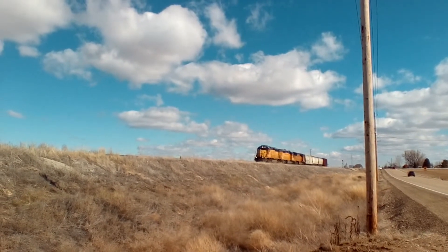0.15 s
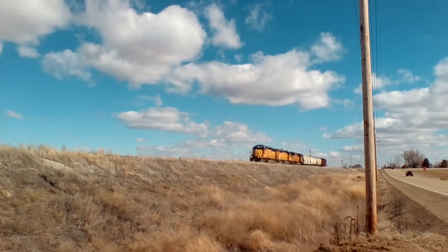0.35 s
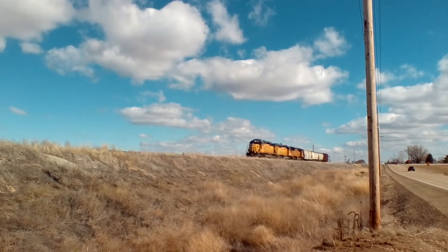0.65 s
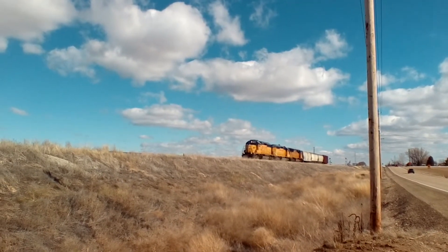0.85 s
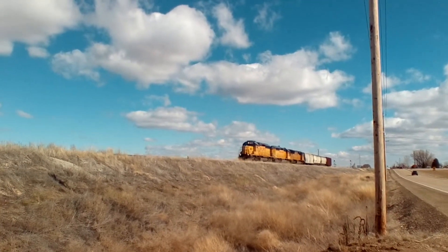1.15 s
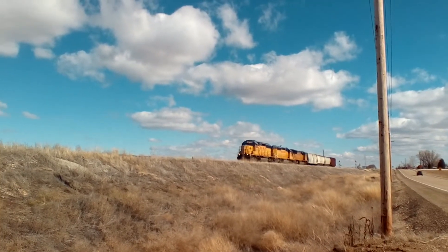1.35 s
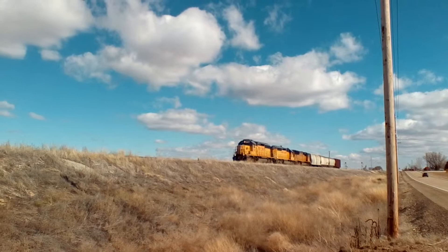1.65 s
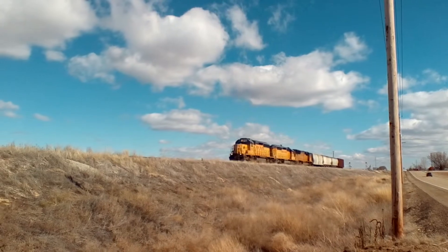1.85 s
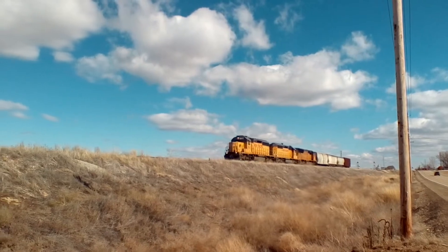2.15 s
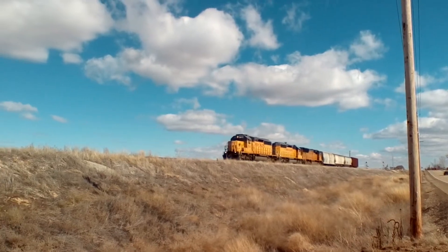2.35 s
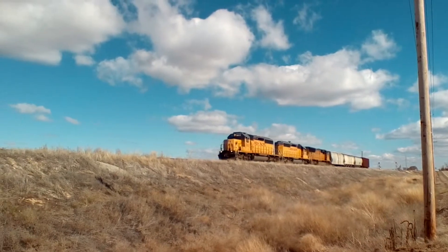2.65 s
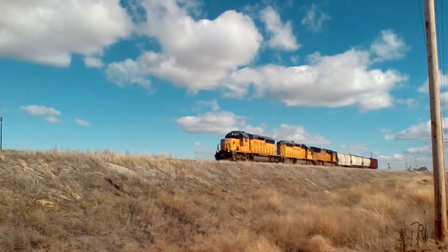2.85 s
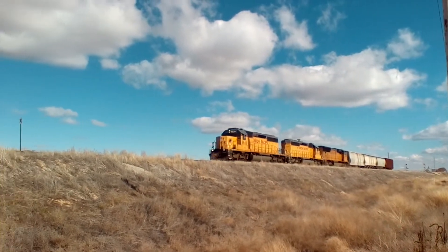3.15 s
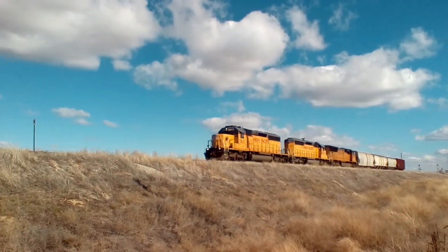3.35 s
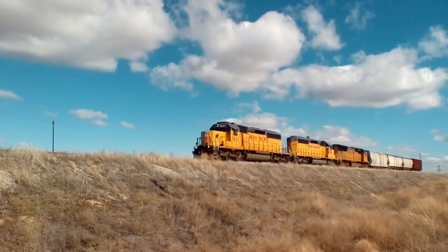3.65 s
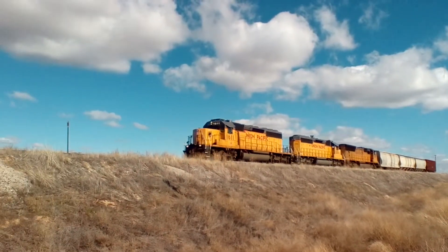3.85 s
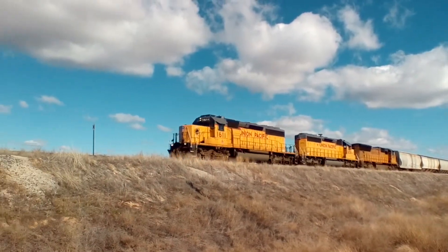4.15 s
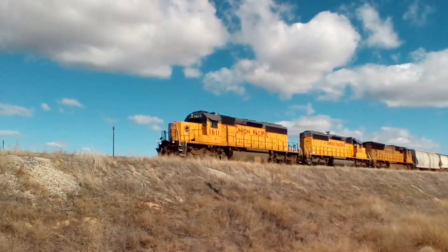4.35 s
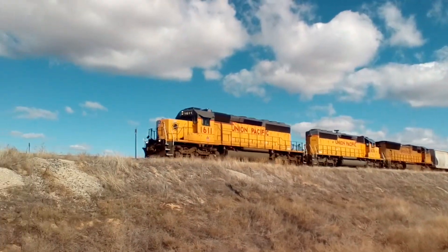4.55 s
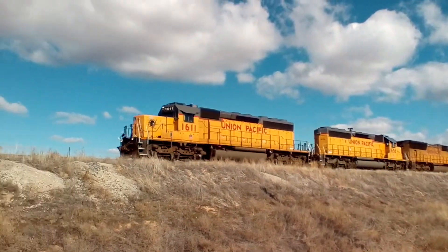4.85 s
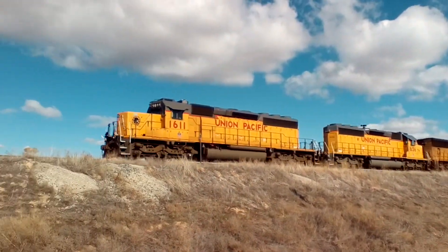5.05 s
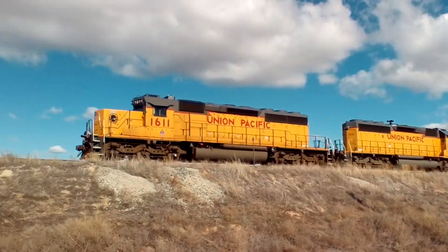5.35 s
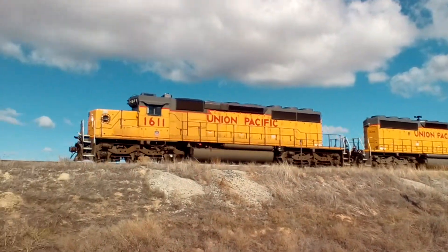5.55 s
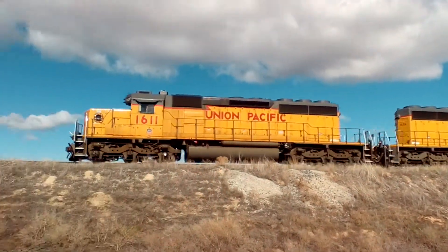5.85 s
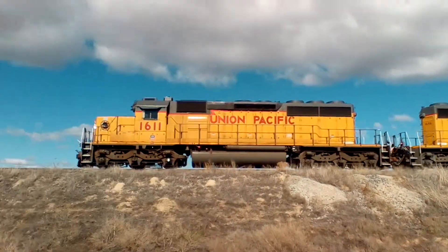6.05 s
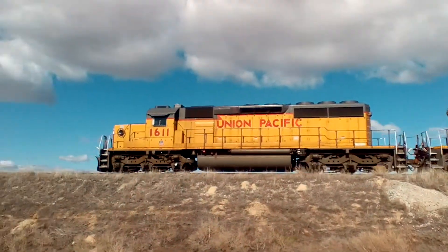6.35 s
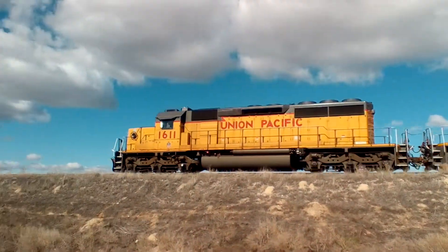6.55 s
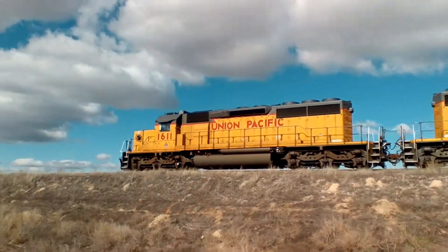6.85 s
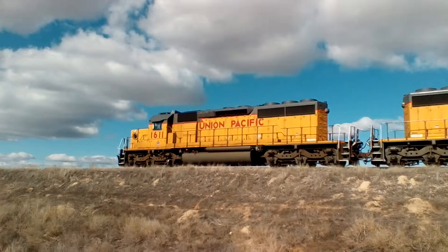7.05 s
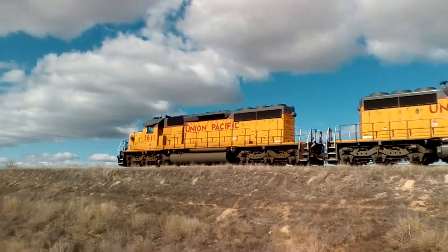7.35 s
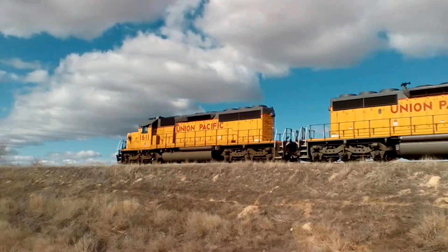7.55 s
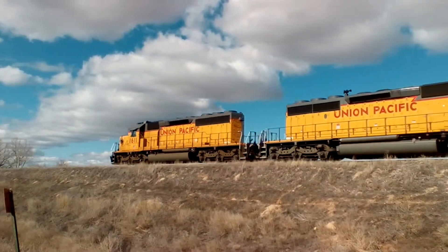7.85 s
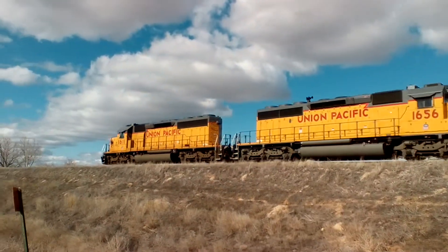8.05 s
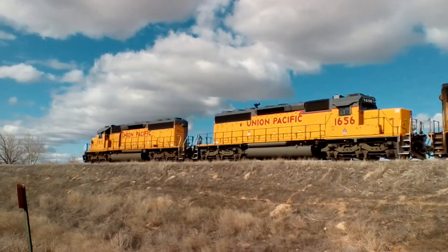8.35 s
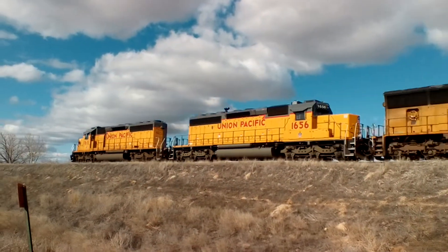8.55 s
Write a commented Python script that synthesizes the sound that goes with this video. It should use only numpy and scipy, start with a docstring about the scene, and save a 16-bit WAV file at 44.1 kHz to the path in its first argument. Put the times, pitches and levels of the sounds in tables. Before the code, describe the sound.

A low, uneven diesel throb begins far off in open country, nearly alone over faint microphone hiss and tiny ticks. Running gear emerges as a muffled roar, opening up as the train nears. One abrupt blow-off of compressed air cuts through just before the engine comes abreast. The pitch sinks slightly in passing, while wheels and panels hum, briefly squeal and clatter in beats, still building when it stops. Small single-channel camera microphone.

```python
"""At the foot of an embankment, diesel locomotives at low throttle roll towards a small camera and pass beside it.
Sine tones locked to the crankshaft, over noise, make the throbbing exhausts and the blower whine.
Shaped noise makes the running gear, which roars and brightens as it nears, and one blow-off of an air valve.
Panels and wheels sing as swelling tones; faint ticks and clicks are short puffs and impulses.
The camera's case and microphone port colour the treble; it limits peaks and hisses faintly."""
import sys
import numpy as np
from scipy import signal
from scipy.fft import rfft, irfft, next_fast_len
from scipy.io import wavfile
from scipy.ndimage import uniform_filter1d, minimum_filter1d, map_coordinates

SR = 44100
rng = np.random.default_rng(int(sys.argv[2]) if len(sys.argv) > 2 else 0)


def dump_mix(stems):
    """Bounce the given channels to the path in sys.argv[1] as a 16-bit WAV at rate SR."""
    frames = np.atleast_2d(stems).T  # one column per channel
    limited = np.clip(frames, -1, 1)  # hard clip at full scale
    pcm = np.round(limited * 32767).astype(np.int16)
    wavfile.write(sys.argv[1], SR, pcm)


N = 384552  # length in samples

# Engine loudness over time: t/s, upper tones level/dB, deep tone level/dB, rumble level/dB
ENGINE_LEVELS = [(0, -36.5, -46, -42), (2, -39.5, -48, -36), (4, -34.5, -40, -32.5),
                 (5.5, -33.5, -33.5, -32), (7, -35.5, -34.5, -27), (8.72, -35.5, -40.5, -27.5)]
# Uneven cylinders sound many multiples of the shaft rate: multiple, relative level/dB
EXHAUST_ORDERS = [(9, -19), (10, -9.5), (12, -16), (13, -15), (15, 5), (16, -2.5), (17, -1.5), (18, -5)]
# Colour of the exhaust rumble: f/Hz, relative level/dB per Hz
RUMBLE_COLOUR = [(20, -45), (33, -21), (40, -9.5), (59, -4), (86, -2), (99, -2.5), (119, -7.5), (150, -12),
                 (200, -39.5), (330, -120)]
# Blower gears: multiple of the shaft rate, start t/s, end t/s, level at start/dB, growth/dB per s
BLOWER_WHINES = [(100, 2.1, 4.1, -50, 4.5), (158, 3.3, 4.0, -57, 0), (200, 3.3, 5.9, -55, 2.5)]
# Running gear and engine rooms: t/s, roar level/dB, clatter level/dB
ROLLING_LEVELS = [(0.0, -49, -58), (0.68, -46.5, -63.5), (2.2, -43, -59), (3.06, -37.5, -53.5),
                  (3.74, -34, -49), (4.73, -30.5, -44), (5.4, -27, -40.5), (5.9, -24.5, -34.5),
                  (6.85, -23, -35), (7.3, -22, -33), (7.84, -21.5, -31), (8.72, -18, -26.5)]
# Train colour when hidden behind the bank: f/Hz, relative level/dB per Hz
HIDDEN_COLOUR = [(76, -34.5), (130, 0.5), (222, -11.5), (288, -8.5), (356, -16), (428, -11.5), (462, -15),
                 (498, -10.5), (666, -14.5), (800, -23.5), (850, -19), (1090, -24), (1690, -33),
                 (2800, -41), (3800, -58), (4300, -76), (5000, -87.5), (6500, -92), (11000, -120)]
# Train colour when alongside: f/Hz, relative level/dB per Hz
ALONGSIDE_COLOUR = [(76, -39), (130, -13.5), (183, 0), (262, 0.5), (370, -3.5), (474, -7.5), (618, -10),
                    (1150, -22), (1460, -22.5), (1870, -19.5), (2150, -22.5), (2760, -19), (3490, -30),
                    (4990, -50), (5400, -65), (7020, -93), (11900, -120)]
# Clatter beats, regular short swells of the clatter: first beat t/s, limit for last beat t/s, beats per s,
# level rise/dB
CLATTER_BEATS = [(5.1, 5.66, 5.45, 2.5), (6.754, 8.56, 6.66, 3)]
# The near train's highest hiss: f/Hz, relative level/dB per Hz
RUSTLE_COLOUR = [(3240, -43), (5500, -12), (6050, -8), (6570, -20.5), (7010, -22.5), (9750, -19.5),
                 (13600, 1.5), (14300, 2), (15500, -13.5)]
# Body panels and wheels that sing for a while: middle t/s, length/s, f/Hz, level/dB
SINGING_PARTS = [(.6, 1.4, 439, -58), (4.5, .5, 432, -44.5), (5.85, 0.16, 699, -39), (6.0, .4, 547, -36),
                 (6.9, .61, 185, -30.5), (7.1, .67, 255, -27.5), (7.5, .54, 175, -27.5),
                 (7.75, 0.7, 212, -22), (7.9, 1.3, 377.5, -26.5), (7.98, .15, 1895, -33.5),
                 (8.1, 0.8, 255, -29.5), (8.18, 1.1, 197, -33), (8.2, .36, 1970, -40.5),
                 (8.55, .17, 1696, -31.5), (8.58, .3, 345, -25)]
# Panels struck once a shaft turn: middle t/s, length/s, f/Hz, level/dB, moment of one throb peak t/s
THROBBING_PANELS = [(5.05, .75, 383, -33, 4.98), (6.3, 1.8, 284.5, -21.5, 6.2)]
# Valve jet, first its body and then its top: seep level/dB, cracked level/dB, open level/dB,
# peak level/dB, pressure loss/dB per s, closing/dB per s
VALVE_LEVELS = [(-60, -35.5, -24.5, -21, 24, 109.5), (-69, -59, -45, -39.5, 48.5, 100)]
# Colour of the jet's body: f/Hz, relative level/dB per Hz
JET_BODY_COLOUR = [(470, -36.5), (800, -15), (983, -7.5), (1180, -9), (1260, -6.5), (1630, -6),
                   (1850, -2.5), (2190, -1.5), (2860, 2), (3860, -10.5), (5300, -25), (6890, -57),
                   (11700, -120)]
# Colour of the jet's top: f/Hz, relative level/dB per Hz
JET_TOP_COLOUR = [(3120, -48.5), (5300, -18.5), (6180, -18.5), (8010, -30.5), (9950, -20.5), (10300, -19.5),
                  (10900, -22.5), (12300, -15), (13600, -0.5), (15500, -16)]
# Faint dull ticks: t/s, peak level/dB, f/Hz
DULL_TICKS = [(.287, -57, 3030), (1.054, -69, 3740), (1.292, -69, 3600), (1.514, -65, 3950),
              (2.44, -75, 4600)]
# Tiny sharp clicks: t/s, peak level/dB
SHARP_CLICKS = [(7.7687, -55), (7.829, -56), (7.9088, -63), (7.9488, -52), (8.129, -58), (8.27, -65),
                (8.4886, -50.5)]
# The camera case rings along: f/Hz, width/Hz, boost level/dB
CASE_PEAKS = [(1257, 34, 2.5), (1543, 31, 2.5), (1660, 28, 1.5), (1876, 22, 4.5), (2004, 27, 4.5),
              (2367, 38, 2), (2470, 47, 3), (2900, 57, 3), (3270, 44, 3), (3360, 62, 3.5), (3500, 18, 4.5),
              (3810, 31, 5), (4180, 25, 1.5)]
# Dips of the microphone port: f/Hz, width/Hz, change of level/dB
PORT_DIPS = [(5520, 290, -13), (6560, 110, -40.5), (7500, 57, -22.5), (8040, 81, -29), (8740, 200, -14),
             (10900, 200, -7.5)]
# Colour of the microphone hiss: f/Hz, relative level/dB per Hz
HISS_COLOUR = [(2650, -58), (4500, -21.5), (5390, -33), (10300, -23.5), (11100, -16), (12400, -7.5),
               (13600, 2.5), (14400, -5.5), (15200, -12), (15500, -14)]

# Crankshaft turns per s, train speed, nearest distance and its moment
SHAFT_HZ, SPEED_M_S, TRACK_M, ABREAST_S = 5.28, 17.5, 16, 6.3
FADE_DB_PER_S = 25  # how fast a whine comes in and dies away
# Clatter levels of a hidden and a clear train; the clearest view reached (1 = fully clear)
HIDDEN_DB, IN_VIEW_DB, NEAREST = -66, -28, .82
RUSTLE_DB, RUSTLE_GROWS = -69, 1.3  # level at the loudest clatter; dB per dB of clatter
SING_WANDER_PER_S, THROB_WANDER_PER_S = 20, 9  # how often the tones waver
THROB_DEPTH_DB, THROB_SCATTER_DB = 16, 2
# The valve seeps, cracks, opens, peaks, closes; STEP_S is how long each sudden step takes
LEAK_S, CRACK_S, OPEN_S, PEAK_S, SHUT_S, STEP_S = 5.71, 5.92, 5.945, 5.977, 6.38, .011
CLICK_HZ, CLICK_WIDTH_HZ = 11500, 3000
CEILING = .43  # limiter threshold (1 = full scale)
HISS_DB, FLICKER_ABOVE_HZ = -76, 10700  # the hiss is steady below this frequency
TOP_HZ = 15680  # nothing passes from here up


def engines():
    """Each exhaust tone is a multiple of the shaft rate, over pipe rumble; blower gears whine higher up."""
    tone_db, deep_db, rumble_db = curves(ENGINE_LEVELS)
    angle = shaft()

    def exhaust_tone(multiple):
        """One shaft multiple, wavering in strength and phase."""
        strength = amp(1.5 * wobble(1.2))
        phase = rng.uniform(0, 2 * np.pi) + .5 * wobble(1.5)
        return strength * np.sin(multiple * angle + phase)

    tones = sum(amp(db) * exhaust_tone(multiple) for multiple, db in EXHAUST_ORDERS)
    deep = exhaust_tone(8)
    rumble = noise(RUMBLE_COLOUR)
    exhaust = amp(tone_db) * unit(tones) + amp(deep_db) * unit(deep) + amp(rumble_db) * rumble
    return exhaust + blower(angle)


def blower(angle):
    """The blower gears sound high multiples of the shaft rate, so their whine follows the shaft."""
    t = np.arange(N) / SR
    whine = np.zeros(N)
    for multiple, start, end, db, growth_db in BLOWER_WHINES:
        outside_s = np.maximum(np.maximum(start - t, t - end), 0)
        level_db = db + growth_db * (t - start) - FADE_DB_PER_S * outside_s + 1.8 * wobble(6)
        whine += amp(level_db) * np.sin(multiple * angle + .7 * wobble(12))
    return whine


def shaft():
    """Crankshaft angle as heard: the pitch drops as the train goes by, as approach turns to departure."""
    ahead_m = SPEED_M_S * (ABREAST_S - np.arange(N) / SR)
    approach_m_s = SPEED_M_S * ahead_m / np.hypot(ahead_m, TRACK_M)
    return turns(SHAFT_HZ * (1 + approach_m_s / 343))  # 343 m/s is the speed of sound


def rolling():
    """A low roar under a swelling clatter; bank and air hide the treble until the train is near."""
    hz, t, z = signal.stft(rng.standard_normal(N), SR, nperseg=1024)
    at = np.minimum((t * SR).astype(int), N - 1)
    roar_curve, clatter_curve = curves(ROLLING_LEVELS)
    roar_db, clatter_db = roar_curve[at], clatter_curve[at]
    near = np.clip((clatter_db - HIDDEN_DB) / (IN_VIEW_DB - HIDDEN_DB), 0, NEAREST)

    # blend the hidden colour into the near one
    far_db = np.outer(along(HIDDEN_COLOUR, hz), 1 - near)
    near_db = np.outer(along(ALONGSIDE_COLOUR, hz), near)
    colour = amp(far_db + near_db)
    # roar hands over to clatter between 640 and 1280 Hz
    high = np.clip(np.log2(hz / 640 + 1e-3), 0, 1)[:, None]
    roar = amp(roar_db) * unit_frames(colour * np.sqrt(1 - high))
    clatter = amp(clatter_db + clatter_beats(t)) * unit_frames(colour * np.sqrt(high))

    # moving air mottles far sound most: smooth random patches in time and pitch
    patches = rng.standard_normal(z.shape)
    for axis in (0, 1):
        patches = uniform_filter1d(patches, size=4, axis=axis)
    depth_db = .4 + high * (.7 + 2.6 * (1 - near) ** 2)
    mottle = amp(depth_db * unit(patches))
    train = signal.istft(z * np.hypot(roar, clatter) * mottle, SR, nperseg=1024)[1][:N]
    return train + rustle(clatter_curve)


def unit_frames(part):
    """Scale each time frame to rms 1 across pitch."""
    return part / np.sqrt(np.mean(part ** 2, axis=0))


def clatter_beats(t):
    """Regular short swells of the clatter, in dB."""
    rise_db = 0
    for first, last, rate, db in CLATTER_BEATS:
        for s in np.arange(first, last, 1 / rate):
            rise_db = rise_db + db * np.exp(-((t - s) / .035) ** 2)
    return rise_db


def rustle(clatter_db):
    """The train's highest hiss: noise that grows faster than the clatter."""
    level_db = RUSTLE_DB + RUSTLE_GROWS * (clatter_db - clatter_db.max()) + 2.5 * wobble(25)
    return amp(level_db) * noise(RUSTLE_COLOUR)


def singing():
    """Panels and wheels ring at their own pitches, swelling and fading; some throb with the shaft."""
    t, angle = np.arange(N) / SR, shaft()

    def swell(middle, length, power):
        """Rise and fall; a higher power gives a flatter top."""
        return np.exp(-(2 * (t - middle) / length) ** power)

    def unsteady_tone(hz, rate):
        """A sine wavering in strength and phase."""
        return amp(1.5 * wobble(rate)) * np.sin(2 * np.pi * hz * t + 1.2 * wobble(rate))

    out = np.zeros(N)
    for middle, length, hz, db in SINGING_PARTS:
        out += amp(db) * swell(middle, length, 2) * unsteady_tone(hz, SING_WANDER_PER_S)
    for middle, length, hz, db, peak_s in THROBBING_PANELS:
        since_peak = angle - angle[round(peak_s * SR)]
        throb_db = THROB_DEPTH_DB * (np.cos(since_peak) - 1) / 2 + THROB_SCATTER_DB * wobble(5)
        out += amp(db + throb_db) * swell(middle, length, 8) * unsteady_tone(hz, THROB_WANDER_PER_S)
    return out


def valve():
    """Escaping air is a turbulent jet: two layers of noise, fluttering as the pressure falls."""
    body_db, top_db = (opening(*row) for row in VALVE_LEVELS)
    flutter_db = wobble(35)
    body = amp(body_db + flutter_db) * noise(JET_BODY_COLOUR)
    top = amp(top_db + flutter_db + 1.5 * wobble(30)) * noise(JET_TOP_COLOUR)
    return body + top


def opening(seep_db, crack_db, open_db, peak_db, loss_db, closing_db):
    """Level of a jet layer in dB as the valve moves through its stages."""
    shut_db = peak_db - loss_db * (SHUT_S - PEAK_S)
    return curves([
        (LEAK_S - STEP_S, -120), (LEAK_S, seep_db),
        (CRACK_S - STEP_S, seep_db), (CRACK_S, crack_db),
        (OPEN_S - STEP_S, crack_db), (OPEN_S, open_db),
        (PEAK_S, peak_db), (SHUT_S, shut_db), (SHUT_S + 1, shut_db - closing_db)])[0]


def ticks():
    """Short dull ticks: each a puff of narrow noise that starts fast and dies away."""
    out, t = np.zeros(N), np.arange(N) / SR
    for s, db, hz in DULL_TICKS:
        after = np.maximum(t - s, 0)
        envelope = amp(-60 * after / .02) * (1 - np.exp(-after / .001))  # falls 60 dB in 0.02 s
        puff = envelope * rng.standard_normal(N)
        puff = filtered(puff, lambda f: np.exp(-((f - hz) / 650) ** 2))
        out += amp(db) * puff / np.abs(puff).max()
    return out


def clicks():
    """Tiny sharp clicks: single impulses with only their treble left."""
    out = np.zeros(N)
    for s, db in SHARP_CLICKS:
        out[round(s * SR)] = amp(db)
    peak = 2 * np.sqrt(np.pi) * CLICK_WIDTH_HZ / SR  # height the filter leaves of an impulse of 1
    return filtered(out, lambda hz: np.exp(-((hz - CLICK_HZ) / CLICK_WIDTH_HZ) ** 2)) / peak


def scene():
    """All the sounds together, with the tiny sharp clicks, as one channel."""
    return (engines() + rolling() + singing() + valve() + ticks() + clicks())[None]


def record(dry):
    """Case and port colour the sound, a limiter holds peaks, the microphone hisses, the top is cut."""
    heard = filtered(dry, lambda hz: amp(bumps(CASE_PEAKS + PORT_DIPS, hz)))
    return filtered(limiter(heard) + microphone_hiss(), lambda hz: hz < TOP_HZ)


def limiter(heard):
    """Turn the gain down smoothly around peaks above the ceiling."""
    needed = np.minimum(1, CEILING / (np.abs(heard) + 1e-9))
    lowest = minimum_filter1d(needed, size=801)
    return heard * uniform_filter1d(lowest, size=601)


def microphone_hiss():
    """Faint steady noise whose highest treble flickers."""
    hiss = amp(HISS_DB) * noise(HISS_COLOUR)
    top = filtered(hiss, lambda hz: hz > FLICKER_ABOVE_HZ)
    return hiss - top + amp(2.2 * wobble(45)) * top


def bumps(rows, f):
    """Sum of resonance peaks or dips in dB, from rows of f/Hz, width/Hz, level/dB."""
    return sum(db / (1 + ((f - hz) / width * 2) ** 2) for hz, width, db in rows)


def amp(db):
    """Decibels to gain."""
    return 10 ** (np.asarray(db) / 20)


def unit(x):
    """Scale to rms 1."""
    return x / np.sqrt(np.mean(x ** 2) + 1e-20)


def along(points, hz):
    """Read a colour table at any frequency on a log axis; -150 dB outside it."""
    f, v = np.transpose(points)
    return np.interp(np.log(hz + 1), np.log(f + 1), v, -150, -150)


def curves(rows):
    """One value per sample for each column after the time."""
    s, *columns = np.transpose(rows)
    return [np.interp(np.arange(N) / SR, s, c, c[0], c[-1]) for c in columns]


def wobble(rate):
    """A smooth random curve through rate random points a second."""
    points = rng.standard_normal(int(N * rate / SR) + 4)
    return map_coordinates(points, [np.arange(N) * rate / SR])


def filtered(x, response):
    """Shape x by a gain for each frequency; mirrored ends keep the edges smooth."""
    edge = 4096  # samples
    padding = [(0, 0)] * (x.ndim - 1) + [(edge, edge)]
    x = np.pad(x, padding, mode="reflect", reflect_type="odd")
    m = next_fast_len(N + 2 * edge)
    spectrum = rfft(x, m) * response(np.fft.rfftfreq(m, 1 / SR))
    return irfft(spectrum, m)[..., edge:edge + N]


def noise(colour):
    """Random noise shaped by a colour table, scaled to rms 1."""
    return unit(filtered(rng.standard_normal(N), lambda hz: amp(along(colour, hz))))


def turns(rate):
    """Running angle in radians of something that turns rate times a second."""
    return 2 * np.pi * np.cumsum(rate) / SR


dry = scene()
out = record(dry)
dump_mix(out)
```